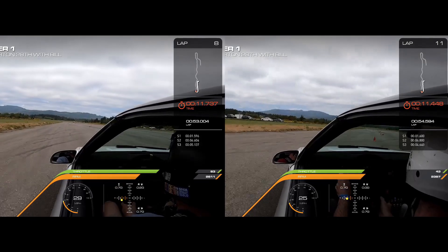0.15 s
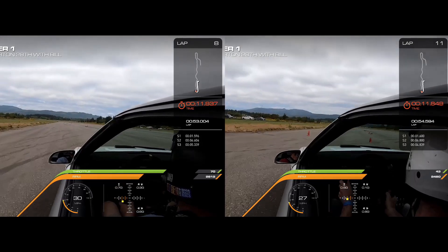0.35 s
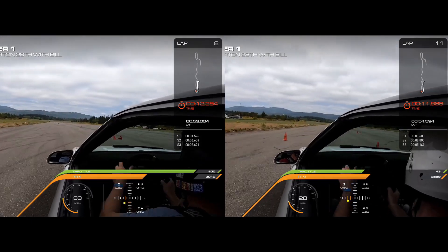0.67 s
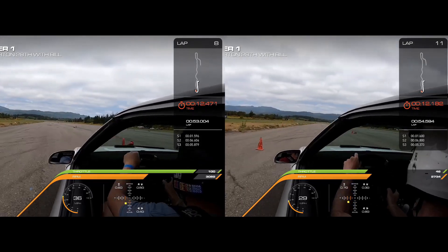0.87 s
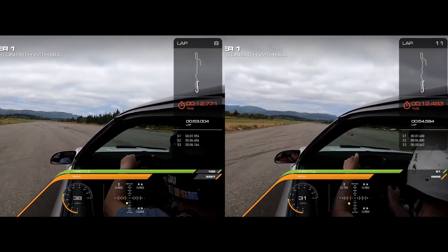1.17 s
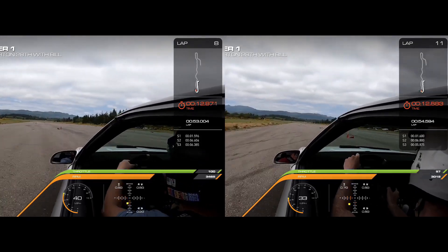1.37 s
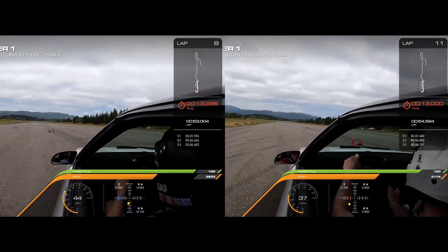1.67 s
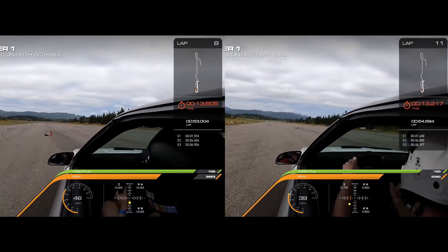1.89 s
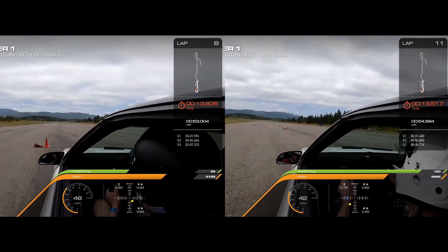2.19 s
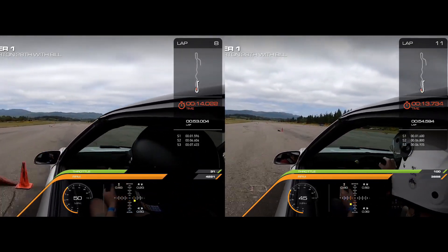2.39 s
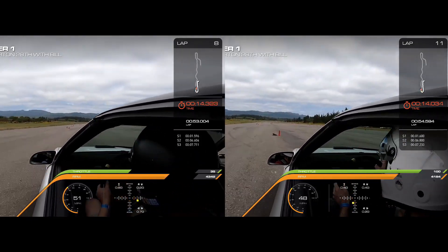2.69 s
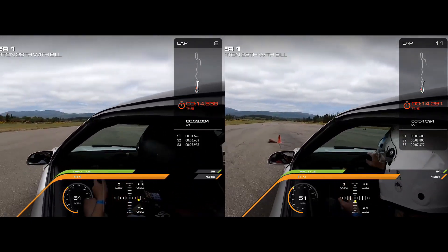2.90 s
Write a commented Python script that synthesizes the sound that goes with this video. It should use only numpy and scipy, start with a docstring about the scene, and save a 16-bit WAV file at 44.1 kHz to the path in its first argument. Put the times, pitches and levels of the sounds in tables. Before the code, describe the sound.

A car engine hums unevenly at part throttle, then roars at full throttle, rising in pitch with a harsh rasp before a sudden lift; wind and road rumble beneath, close microphone on the car body, clipping.

```python
"""An eight-cylinder car goes to full throttle, climbs in revs and lifts off, heard from a microphone on its body.
Exhaust: sines at multiples of the four-stroke cycle, weighted by throttle, revs and fixed resonances of exhaust
and cabin. Intake rasp: high multiples and firing-modulated noise. Wind and road: shaped noise rumble and hiss.
One low body boom, a brief treble rustle and, after the lift, a thin high squeal. The input clips."""
import sys
import numpy as np
from scipy.fft import rfft, irfft, next_fast_len
from scipy.io import wavfile
from scipy.ndimage import map_coordinates

SR = 44100
rng = np.random.default_rng(int(sys.argv[2]) if len(sys.argv) > 2 else 0)


def transcribe(signal):
    """Save signal, clipped to [-1, 1], as a 16-bit WAV file at the path in sys.argv[1]."""
    frames = np.atleast_2d(signal).T
    limited = np.clip(frames, -1, 1)
    pcm = np.round(limited * 32767).astype(np.int16)
    wavfile.write(sys.argv[1], SR, pcm)


N = 134505
TIME = np.arange(N) / SR
CYLINDERS = 8

# Low multiples of the cycle: multiple, part_throttle_db, full_low_revs_db, full_middle_revs_db,
# full_high_revs_db, lifted_db
MULTIPLES = [(2, 7.5, -9.5, 5.5, 1.5, 5.0), (3, -0.5, 5.5, -0.5, 7.5, 4.5), (4, -3.5, -2.5, 1.5, -6.0, 5.0),
             (5, -1.5, -4.0, -5.5, -0.5, -1.5), (6, 2.5, 2.5, 10.5, 4.5, 4.0),
             (7, -1.0, -3.5, 0.0, -1.0, 15.0), (8, 5.5, 11.0, 16.0, 10.5, 3.5),
             (9, -6.5, -5.0, -3.5, 3.0, 5.0), (10, 3.5, 6.0, 3.5, -3.0, -4.5),
             (11, 4.5, 5.5, -5.5, -0.5, -9.5), (12, -3.0, -3.5, -0.5, -6.5, -7.5),
             (13, -2.5, -6.0, -5.0, 6.0, -1.0), (14, -2.0, 0.0, 8.0, -2.0, 3.5),
             (15, -3.0, -2.0, 8.0, -2.5, -1.5), (16, -4.0, 4.0, 11.0, 2.5, -2.5),
             (17, -4.0, -2.0, -8.5, -1.5, 5.5), (18, -1.5, -6.0, -0.5, 3.0, 4.0),
             (19, -8.5, 3.5, 2.5, -0.5, -11.0), (20, 0.0, -0.5, -8.0, -3.5, -5.5),
             (21, 3.0, -4.0, -6.0, 6.0, -2.0), (22, -8.5, 0.5, 5.0, -3.5, -8.0),
             (23, -0.5, -0.5, 1.0, 1.0, -9.0), (24, -8.0, -2.5, 4.0, -1.0, -7.0)]


def amp(db):
    """Decibels to amplitude ratio."""
    return 10 ** (np.asarray(db) / 20)


def unit(x):
    """Scale to rms 1."""
    return x / np.sqrt(np.mean(x ** 2) + 1e-20)


def curve(rows):
    """(time_s, value) rows, interpolated to one value per sample."""
    return np.interp(TIME, *np.transpose(rows))


def along(points, hz):
    """(freq_hz, level_db) points, interpolated in dB on a log frequency axis."""
    point_hz, point_db = np.transpose(points)
    return np.interp(np.log(hz + 1), np.log(point_hz + 1), point_db)


def wobble(rate_hz):
    """Random curve: Gaussian knots, rate_hz a second, joined by straight lines."""
    knots = rng.standard_normal(int(N * rate_hz / SR) + 4)
    return map_coordinates(knots, [TIME * rate_hz], order=1)


def filtered(x, response):
    """Zero-phase filter: spectrum times a real response of frequency."""
    size = next_fast_len(N + 8192)
    hz = np.fft.rfftfreq(size, 1 / SR)
    return irfft(rfft(x, size) * response(hz), size)[:N]


def noise(spectrum):
    """Coloured noise of rms 1."""
    return unit(filtered(rng.standard_normal(N), lambda hz: amp(along(spectrum, hz))))


def unsteady(phase, shimmer_db, drift_rad, rate_hz):
    """Sine of random start phase whose level and phase wander."""
    level = amp(shimmer_db * wobble(rate_hz))
    start_rad = rng.uniform(0, 2 * np.pi)
    return level * np.sin(phase + start_rad + drift_rad * wobble(rate_hz))


def revving(cycle_hz, low_hz, high_hz):
    """0 at low revs, 1 at high revs, linear between."""
    return np.clip((cycle_hz - low_hz) / (high_hz - low_hz), 0, 1)


def bump(centre_s, half_width_s):
    """Gaussian envelope; half width to 1/e."""
    return np.exp(-((TIME - centre_s) / half_width_s) ** 2)


def crank():
    """Rate and phase of the four-stroke cycle, in which every cylinder fires once."""
    # Engine speed: time_s, firing_rate_hz
    firing_rate = [(0, 163), (.18, 164), (.3, 167.5), (.4, 166.6), (.55, 170.3), (.68, 182), (.82, 187.8),
                   (.97, 197.6), (1.1, 200.9), (1.29, 200.8), (1.42, 208.6), (1.74, 226.2), (1.96, 241.3),
                   (2.05, 243.7), (2.22, 254.6), (2.33, 263.6), (2.45, 266), (2.64, 280.8), (2.73, 280.5),
                   (2.82, 277.2), (3.05, 284.5)]
    cycle_hz = curve(firing_rate) / CYLINDERS
    return cycle_hz, 2 * np.pi * np.cumsum(cycle_hz) / SR


def exhaust():
    """Low multiples patterned by throttle and revs; those crossing a body resonance are lifted."""
    # Exhaust and cabin resonances: freq_hz, response_db
    resonances = [(45, -29.0), (70, -29.2), (100, -31.4), (130, -33.5), (160, -31.9), (187, -25.4),
                  (215, -35.0), (245, -39.6), (278, -26.5), (310, -31.8), (350, -35.7), (400, -38.9),
                  (450, -42.8), (490, -36.6), (550, -36.0), (620, -41.0), (680, -47.8), (850, -50.7)]
    # Low, middle and high revs: cycle_hz
    revs_hz = [24, 29, 35]
    open_s, open_takes_s = .5, .13
    lift_s, lift_takes_s = 2.77, .11
    part_rad, loaded_rad, lifted_rad = .4, .08, .15  # phase wander
    shimmer_db_per_rad, gain_db = 8.5, 0.5
    cycle_hz, phase = crank()
    opened = np.clip((TIME - open_s) / open_takes_s, 0, 1)
    lifted = np.clip((TIME - lift_s) / lift_takes_s, 0, 1)
    part, full = 1 - opened, opened - lifted
    rough_rad = part * part_rad + full * loaded_rad + lifted * lifted_rad
    out = np.zeros(N)
    for k, part_db, *full_db, lifted_db in MULTIPLES:
        loaded_db = np.interp(cycle_hz, revs_hz, full_db)
        source_db = part * part_db + full * loaded_db + lifted * lifted_db
        tone = unsteady(k * phase, shimmer_db_per_rad * rough_rad, rough_rad, rate_hz=14)
        out += amp(source_db + along(resonances, k * cycle_hz)) * tone
    return np.sqrt(2) * amp(gain_db) * out  # sqrt(2): sine levels as rms


def rasp():
    """Intake: swelling high multiples and firing-modulated air noise, brightening with revs."""
    # Rasp level: time_s, level_db
    rasp_level = [(0, -51), (.46, -43), (.71, -36), (1.68, -38.5), (1.81, -34), (2.54, -32.5), (2.73, -35),
                  (2.83, -48), (3.05, -47.5)]
    # Intake response at low revs: freq_hz, response_db
    intake_low = [(500, -13.5), (700, 13.5), (800, -14.5), (920, 6.5), (1050, -2), (1250, 3), (1400, 2.5),
                  (1550, -12.5), (1860, -12), (2190, -6), (2680, -16.5), (5000, -44)]
    # Intake response at high revs: freq_hz, response_db
    intake_high = [(700, -18.5), (900, -18.5), (1050, -6.5), (1290, 1.5), (1450, -0.5), (1620, -2.5),
                   (1730, -5.5), (1860, 1.5), (2100, -7), (2800, -22), (5000, -44.5)]
    # High multiples that stand out: multiple
    strong_multiples = [27, 39, 45, 48, 52, 56, 59, 63]
    strong_db, swell_db, breath_db = 6.5, 4.8, -13  # breath: relative to the lines
    cycle_hz, phase = crank()
    lines = np.zeros(N)
    for k in range(len(MULTIPLES) + 2, 96):
        line_db = strong_db * (k in strong_multiples) + swell_db * wobble(3.74)
        lines += amp(line_db) * unsteady(k * phase, shimmer_db=1.2, drift_rad=.18, rate_hz=14)
    gate = 1 + 1.4 * np.cos(CYLINDERS * phase)  # one cycle per firing
    breath = unit(filtered(gate * rng.standard_normal(N), lambda hz: hz < 3300))
    mix = unit(lines) + amp(breath_db) * breath
    low = unit(filtered(mix, lambda hz: amp(along(intake_low, hz))))
    high = unit(filtered(mix, lambda hz: amp(along(intake_high, hz))))
    bright = revving(cycle_hz, low_hz=19.6, high_hz=33)
    return amp(curve(rasp_level)) * (low + bright * (high - low))


def rumble():
    """Wind and road: low noise of lumpy level."""
    # Rumble colour: freq_hz, relative_db
    rumble_spectrum = [(22, 6), (32, 12.5), (45, 5.5), (70, 0.5), (130, -5.5), (250, -7.5), (600, -13),
                       (1000, -60.5)]
    # Rumble level before wobble: time_s, level_db
    rumble_level = [(0, -34.5), (.2, -24), (.5, -30.5), (1.3, -31), (1.45, -35.5), (1.62, -26.5),
                    (2, -31.5), (2.6, -28.5), (2.85, -25.5), (3.05, -31.5)]
    return amp(curve(rumble_level) + 2.2 * wobble(9.9)) * noise(rumble_spectrum)


def hiss():
    """Wind and road: broadband noise of flickering level."""
    # Hiss colour: freq_hz, relative_db
    hiss_spectrum = [(300, -17), (700, -0.5), (2500, -18), (3900, -24), (4600, -27.5), (5300, -26.5),
                     (6200, -32), (7100, -32.5), (8200, -38.5), (10000, -46.5), (16000, -77.5)]
    # Hiss level before wobble: time_s, level_db
    hiss_level = [(0, -42.5), (.5, -43), (.65, -40.5), (2.3, -37.5), (2.75, -40), (3.05, -40.5)]
    return amp(curve(hiss_level) + 1.5 * wobble(25)) * noise(hiss_spectrum)


def boom():
    """Body panel booms once over a bump: a low sine under a Gaussian envelope."""
    centre_s, half_width_s, pitch_hz, level_db = 0.034, .06, 60.6, -17.5
    tone = unsteady(2 * np.pi * pitch_hz * TIME, shimmer_db=-2.0, drift_rad=0.36, rate_hz=24)
    return amp(level_db) * bump(centre_s, half_width_s) * tone


def rustle():
    """Short treble rustle: band noise under a Gaussian envelope."""
    centre_s, half_width_s, level_db = 2.385, .022, -50.5  # level: rms before the envelope
    centre_hz, half_width_hz = 4580, 2792
    band = filtered(rng.standard_normal(N), lambda hz: np.exp(-((hz - centre_hz) / half_width_hz) ** 2))
    return amp(level_db) * unit(band) * bump(centre_s, half_width_s)


def squeal():
    """Thin high tone after the lift: an unsteady sine that fades in and stays."""
    start_s, rise_s, pitch_hz, level_db = 2.86, 0.055, 7070, -69
    fade = np.clip((TIME - start_s) / rise_s, 0, 1)
    tone = unsteady(2 * np.pi * pitch_hz * TIME, shimmer_db=2.5, drift_rad=1.2, rate_hz=60)
    return amp(level_db) * fade * tone


def scene():
    """Sum of all sources, one channel."""
    engine = exhaust() + rasp()
    air = rumble() + hiss()
    return (engine + air + boom() + rustle() + squeal())[None]


def record(dry):
    """Microphone loses the deepest bass, input clips hard, nothing passes above the band limit."""
    low_cut_hz, top_hz = 18, 15800
    clip_db, clip_knee = -9.7, 14  # higher knee: sharper clip
    heard = filtered(dry[0], lambda hz: hz ** 6 / (hz ** 6 + low_cut_hz ** 6))
    overload = np.abs(heard / amp(clip_db))
    clipped = heard / (1 + overload ** clip_knee) ** (1 / clip_knee)
    return filtered(clipped, lambda hz: hz < top_hz)[None]


dry = scene()
out = record(dry)
transcribe(out)
```